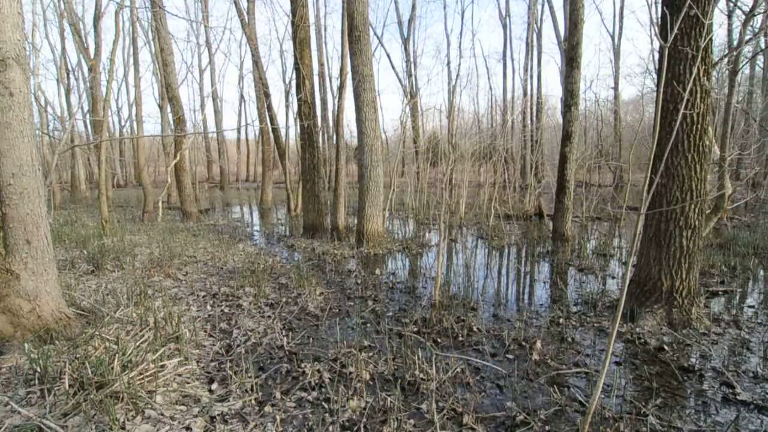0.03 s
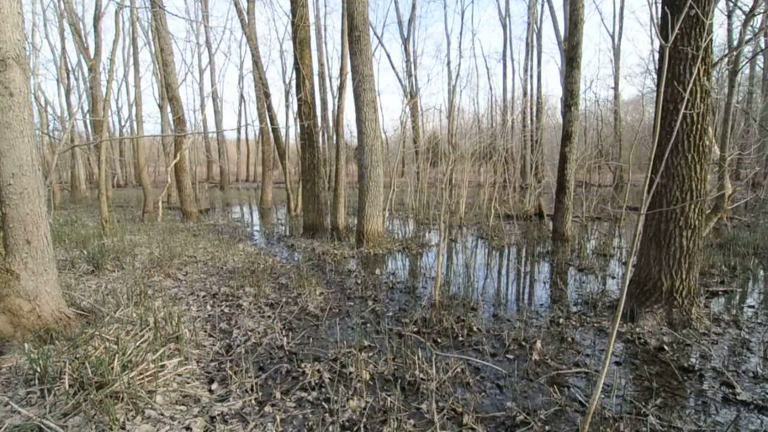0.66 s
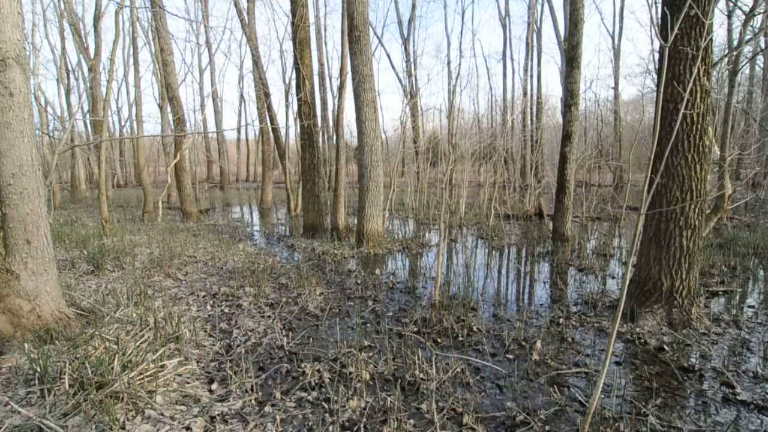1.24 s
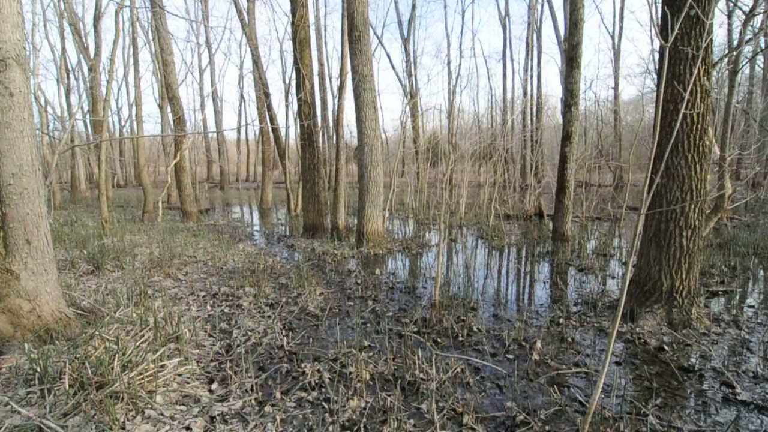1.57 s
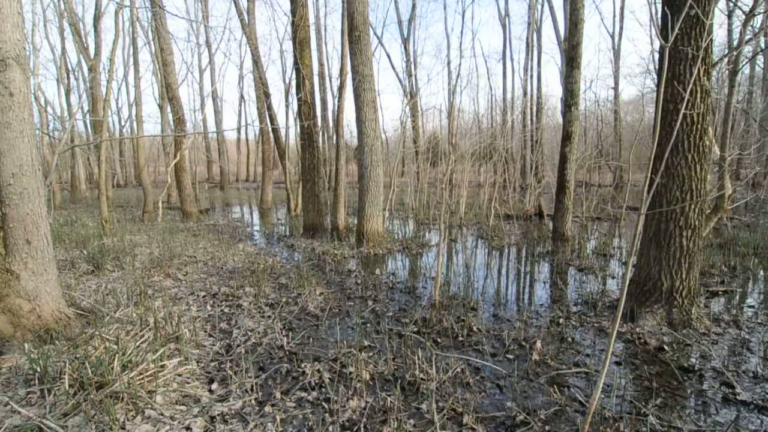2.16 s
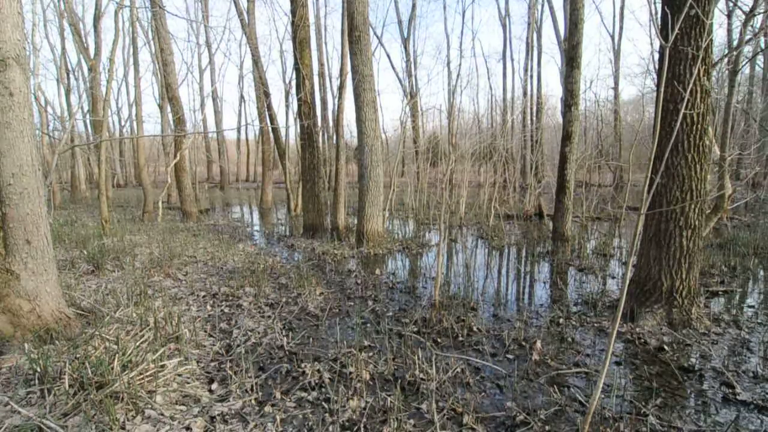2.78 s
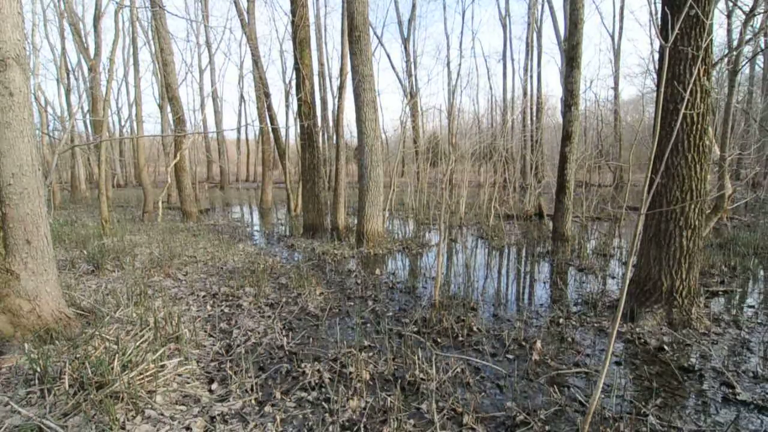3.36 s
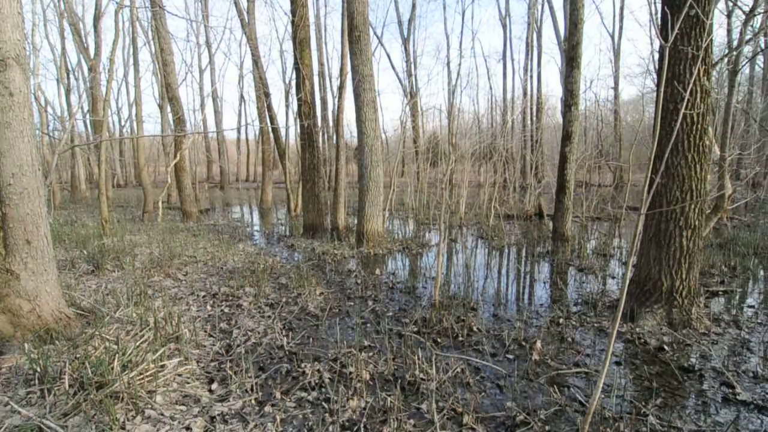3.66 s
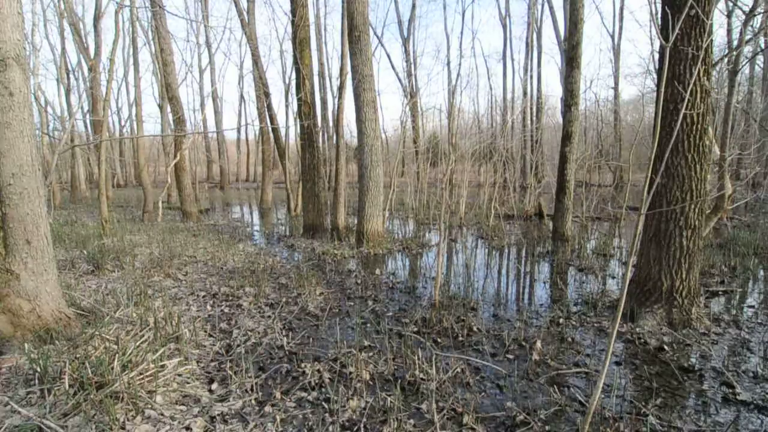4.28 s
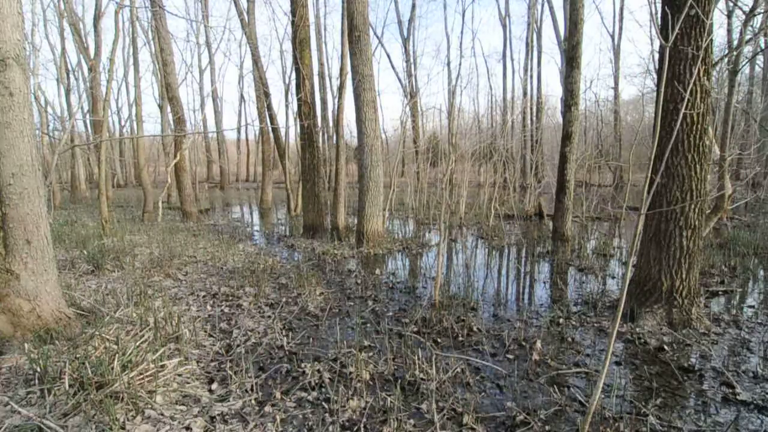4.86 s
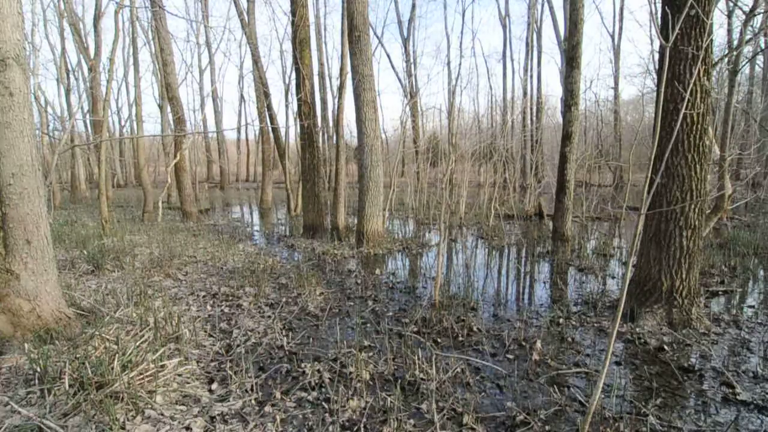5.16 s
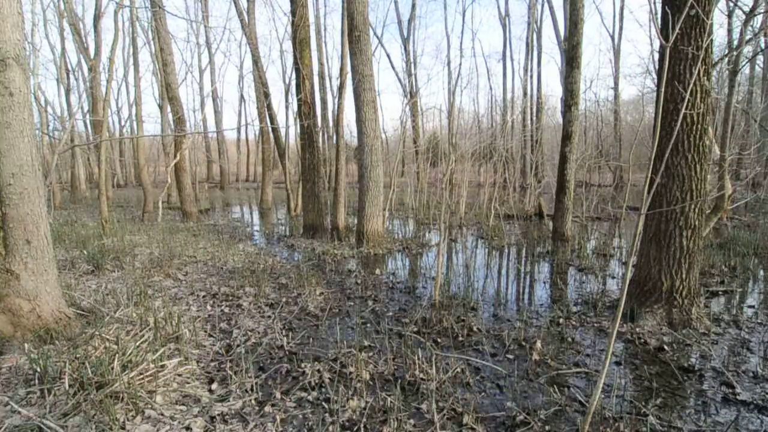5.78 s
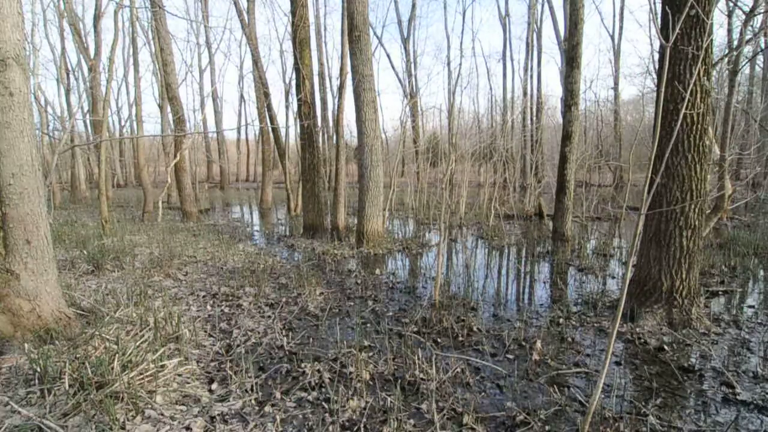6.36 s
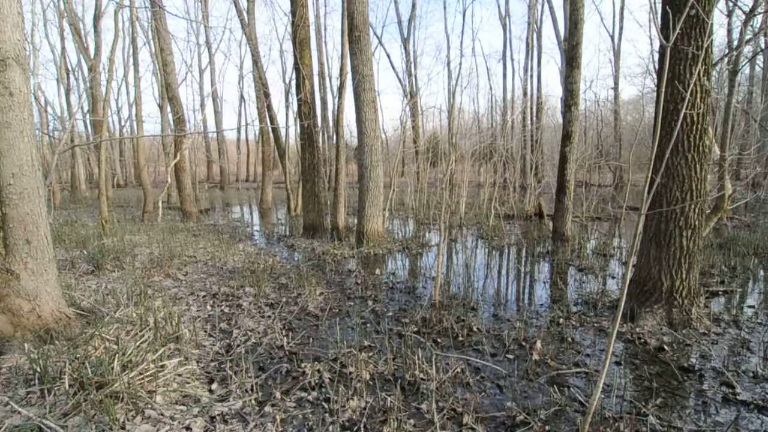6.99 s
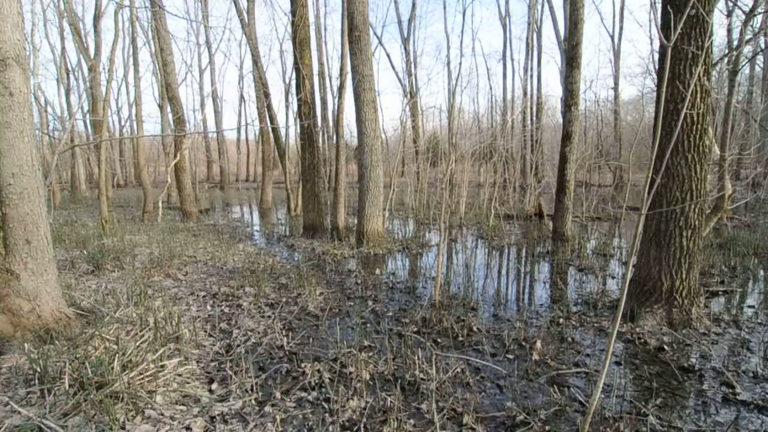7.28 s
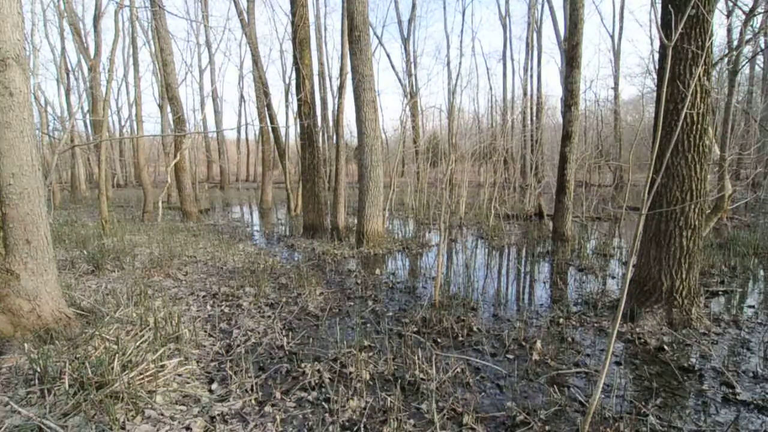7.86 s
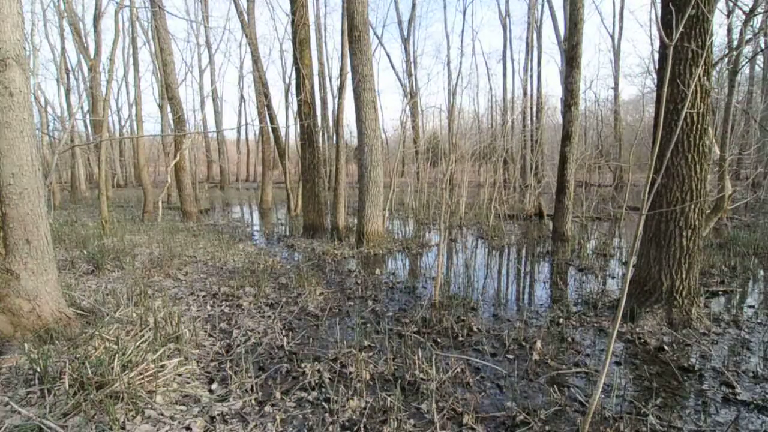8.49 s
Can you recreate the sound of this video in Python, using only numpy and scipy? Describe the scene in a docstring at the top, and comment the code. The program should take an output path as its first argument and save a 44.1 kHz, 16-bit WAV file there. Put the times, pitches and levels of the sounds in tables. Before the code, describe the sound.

A shrill chorus of spring peepers and rasping chorus frogs fills a woodland pool, with wind buffeting the microphone near the end.

```python
"""A shrill chorus of spring peepers fills a flooded woodland pool, over a low rumble. Chorus frogs rasp like
a thumb along a comb; close peepers whistle short rising peeps or trill at a rival, and faint clucks, low
whistles and squeaks come between. Each call is a vibration of the larynx, radiated by the vocal sac and
scattered by the trees. Loud crests tick in the microphone, and near the end a gust buffets it."""
import sys
import numpy as np
from scipy import signal
from scipy.fft import rfft, irfft, next_fast_len
from scipy.io import wavfile
from scipy.ndimage import uniform_filter1d, minimum_filter1d

SR = 44100
rng = np.random.default_rng(int(sys.argv[2]) if len(sys.argv) > 2 else 0)


def unload_wav(signal):
    """Save mono or channel-first audio to the path in sys.argv[1] as 16-bit WAV at rate SR, clipped to [-1, 1]."""
    wavfile.write(
        sys.argv[1],
        SR,
        np.round(np.clip(np.atleast_2d(signal).T, -1, 1) * 32767).astype(np.int16),
    )


N = 380583
TIME = np.arange(N) / SR
CHORUS_HZ = 2938


def from_db(db):
    """Amplitude ratio: tenfold for every 20 dB."""
    return 10 ** (np.asarray(db) / 20)


def unit_rms(x):
    """Normalisation to unit mean power."""
    return x / np.sqrt(np.mean(x ** 2) + 1e-20)


def envelope(rows):
    """Amplitude envelope, interpolated in decibels between rows of time_s, level_db."""
    return from_db(np.interp(TIME, *np.transpose(rows)))


def evened(x, span_s):
    """Running normalisation: division by the local rms holds the power near one."""
    return x / np.sqrt(uniform_filter1d(x ** 2, int(span_s * SR) + 1) + 1e-12)


def add(out, middle_s, sound):
    """Superposition: a sound is summed into the mix, centred on a moment."""
    start = int(middle_s * SR) - len(sound) // 2
    low, high = max(start, 0), min(start + len(sound), N)
    if high > low:
        out[low:high] += sound[low - start:high - start]


def noise(spectrum):
    """Spectral shaping: white noise coloured by rows of frequency_hz, density_db, at unit rms."""
    hz, db = np.transpose(spectrum)
    size = next_fast_len(N)
    bins_hz = np.maximum(np.arange(size // 2 + 1) * SR / size, 1)
    gain = from_db(np.interp(np.log(bins_hz), np.log(hz), db)) / (1 + (bins_hz / hz[-1]) ** 20)
    return unit_rms(irfft(rfft(rng.standard_normal(size)) * gain, size)[:N])


def woods(x, wet_db, first_echo_s=0.018, t60_s=0.65):
    """Scattering: trunks and water return decaying echoes, which change as calls come from new places."""
    size = SR // 2
    t = np.arange(size) / SR
    decay = unit_rms(from_db(-60 * t / t60_s) * (t > first_echo_s)) / np.sqrt(size)
    padded, window = np.pad(x, size), signal.windows.cosine(size)
    wet = np.zeros(N + 2 * size + SR)
    for start in range(0, N + size, size // 2):
        response = decay * rng.standard_normal(size)
        echoes = signal.fftconvolve(padded[start:start + size] * window, response)
        wet[start:start + len(echoes)] += echoes
    return x + from_db(wet_db) * wet[size:size + N]


def throat(hz, first_db, third_db):
    """Harmonic radiation: the vocal sac sounds the second harmonic at hz, with the first and third."""
    phase = 2 * np.pi * (np.cumsum(hz / 2) / SR + rng.random())
    return from_db(first_db) * np.sin(phase) + np.sin(2 * phase) + from_db(third_db) * np.sin(3 * phase)


def peep(hz, glide_hz_per_s, length_s, swell_db=5):
    """Linear frequency sweep: a nearly pure tone that swells towards its end."""
    t = np.arange(-length_s / 2, length_s / 2, 1 / SR)
    shape = signal.windows.tukey(len(t), 0.92) * from_db(swell_db * t / length_s)
    return shape * throat(hz + glide_hz_per_s * t, first_db=-35, third_db=-37)


def far_peepers(count=56, spread_hz=160, period_s=.78, length_s=.14, glide_hz_per_s=2900):
    """Incoherent sources: every male repeats his own pitch at his own pace and distance."""
    out = np.zeros(N)
    ranks = (np.arange(count) + .5) / count
    for hz in CHORUS_HZ + spread_hz * unit_rms(np.log(ranks / (1 - ranks))):  # few are very big or small
        pace_s, offset = period_s * rng.uniform(.8, 1.2), rng.random()
        db = rng.uniform(-6, 4.9) - 3.2 * abs(hz - CHORUS_HZ) / spread_hz  # middling males are loudest
        for k, (late, waver, effort) in enumerate(rng.standard_normal((16, 3))):
            middle_s = (k - offset) * pace_s + .03 * late
            if middle_s < TIME[-1] + length_s:
                call = peep(hz + 25 * waver, glide_hz_per_s * (1 + 0.1993 * effort), length_s)
                add(out, middle_s, from_db(db + 2 * effort) * call)
    return evened(woods(out, wet_db=-6), span_s=0.14)


# Spectrum of the most distant voices: frequency_hz, density_db
WASH_SPECTRUM = [(1000, -47.5), (1500, -27.5), (2050, -34), (2400, -22.5), (2650, -14), (2850, -3.5),
                 (3050, -1), (3300, -11.5), (3600, -32.5), (3900, -34), (4400, -35), (4850, -46.5),
                 (5300, -55.5)]
# Rise and fall of the far chorus: time_s, level_db
CHORUS_LEVELS = [(0.0, -17), (1.06, -15), (1.87, -18.5), (2.21, -16.5), (4.06, -16), (4.2, -19),
                 (4.42, -17.5), (4.71, -15), (5.43, -18), (5.77, -13.5), (5.96, -20.5), (6.18, -19),
                 (6.39, -15.5), (7.26, -19), (7.43, -16), (7.86, -17.5), (8.12, -15.5), (8.63, -17.5)]


def far_chorus():
    """Superposition of many voices: behind the far peepers, the most distant blur into a band of noise."""
    return envelope(CHORUS_LEVELS) * (from_db(-1.7) * far_peepers() + from_db(-8.5) * noise(WASH_SPECTRUM))


def click(hz, width_s, first_db, third_db, fall_hz_per_s=15000):
    """Gaussian tone pulse: one snap of a larynx, sagging in pitch."""
    t = np.linspace(-np.pi * width_s, np.pi * width_s, int(2 * np.pi * width_s * SR))
    return np.exp(-(t / width_s) ** 2) * throat(hz - fall_hz_per_s * t, first_db, third_db)


def far_raspers(count=150, pitch_hz=3060, spread_hz=195, gap_s=.062, quicken=.018, width_s=.0016):
    """Overlapping pulse trains: each distant chorus frog's rasp quickens, rises and grows louder."""
    out, steps = np.zeros(N), np.arange(18)
    for start_s in np.linspace(-1, TIME[-1], count):
        late, voice, slowness, nearness = rng.standard_normal(4)
        times = start_s + .05 * late + np.cumsum(gap_s * np.exp(.15 * slowness - quicken * steps))
        for time_s, effort in zip(times, np.linspace(-1, 0, len(steps))):
            hz = pitch_hz + spread_hz * np.clip(voice, -2, 2) + 120 * (effort + .5)
            db = 4 * np.clip(nearness, -2, 2) + 7 * effort
            add(out, time_s, from_db(db) * click(hz, width_s, first_db=-18.5, third_db=-32))
    # The frogs set each other off, so the rasping comes in waves, 2.4 s apart.
    wave_db = 2 * np.cos(2 * np.pi * (TIME - 0.46) / 2.4)
    return from_db(-24 + wave_db) * evened(woods(out, wet_db=-4), span_s=0.23)


# Spectrum of the low rumble: frequency_hz, density_db
RUMBLE_SPECTRUM = [(20, -11), (50, -1.5), (150, 4.5), (250, 1.5), (400, -4.5), (600, -10), (1100, -11.5)]


def background():
    """Ambient noise floor: a slowly fading rumble and a faint, steady hiss of air."""
    rumble = envelope([(0, -46), (8.6, -51)]) * noise(RUMBLE_SPECTRUM)
    air = from_db(-47.5) * noise([(300, -9.5), (600, -3.5), (1200, -3.5), (2200, 1.0), (5000, -17.5)])
    return rumble + air


# Rasps of the nearest chorus frogs: start_s, gap_s, click_count, pitch_hz, relative_level_db
NEAR_RASPS = [(0.023, 0.0755, 4, 3510, -23), (0.942, 0.0518, 8, 3550, -27.5),
              (2.665, 0.0755, 6, 3525, -23.5), (3.395, 0.058, 4, 3504, -34), (4.814, 0.057, 6, 3550, -27.5),
              (5.138, 0.072, 4, 3500, -26), (5.739, 0.061, 7, 3550, -34.5), (7.043, 0.062, 4, 3500, -25.5),
              (7.297, 0.079, 4, 3500, -23.5), (8.517, 0.075, 3, 3490, -27)]


def near_raspers(waver_hz=30, width_s=.0018, swell_db=1, gain_db=12):
    """Pulse trains slow enough for the ear to resolve: runs of ringing clicks above the peeping."""
    out = np.zeros(N)
    for start_s, gap_s, count, pitch_hz, db in NEAR_RASPS:
        beats = np.arange(count, dtype=float)
        beats[-1] -= 0.2  # the last click comes early
        for time_s, effort_db in zip(start_s + gap_s * beats, np.linspace(-swell_db, 0, count)):
            hz = pitch_hz + waver_hz * rng.standard_normal()
            snap = click(hz, width_s, first_db=-21, third_db=-39.5, fall_hz_per_s=30400)
            add(out, time_s, from_db(db + effort_db + gain_db) * snap)
    return woods(out, wet_db=-9, first_echo_s=0.00067)


# Single close peeps: middle_s, pitch_hz, relative_level_db
NEAR_PEEPS = [(0.059, 3060, -18.5), (0.13, 2960, -19.5), (0.26, 2837, -17), (0.408, 2928, -12),
              (0.47, 3166, -17.5), (0.529, 2680, -19.5), (0.549, 3045, -16.5), (0.867, 3213, -18.5),
              (0.949, 2966, -15.5), (1.197, 3124, -16), (1.377, 2830, -17), (1.437, 2774, -14.5),
              (1.527, 2928, -13), (1.742, 2784, -18), (2.01, 3130, -15.5), (2.041, 2855, -14.5),
              (2.185, 3020, -15.5), (2.189, 2710, -18), (2.419, 2837, -16), (2.461, 3000, -18.5),
              (2.591, 2877, -15), (2.738, 3010, -18), (3.087, 2783, -16.5), (3.212, 2880, -14.5),
              (3.308, 2864, -17), (3.536, 2880, -16), (3.802, 3153, -17), (3.971, 2964, -12.5),
              (4.11, 2990, -13), (4.201, 2894, -16.5), (4.632, 2777, -14), (4.673, 3057, -15),
              (4.714, 3004, -16.5), (4.945, 2640, -22.5), (5.158, 2940, -15.5), (5.624, 2687, -14),
              (5.701, 2984, -15.5), (5.792, 3030, -16), (5.877, 3064, -13.5), (6.235, 2973, -14),
              (6.459, 2875, -12), (6.649, 3000, -15), (6.699, 3083, -16), (6.864, 2950, -15),
              (6.994, 3006, -14.5), (7.348, 2915, -15), (7.459, 2753, -15), (7.508, 2998, -10),
              (7.613, 2953, -18.5), (7.872, 3100, -18.5), (8.067, 3128, -16.5), (8.25, 2755, -16.5),
              (8.331, 3063, -12.5)]
# Males keeping a steady beat: first_peep_s, period_s, peep_count, pitch_hz, relative_level_db
STEADY_BOUTS = [(0.04, 0.785, 4, 3456, -23), (3.25, 0.755, 3, 3410, -23.5), (0.6, 0.744, 2, 2595, -25.5),
                (2.98, 0.852, 5, 2605, -25)]


def near_peepers(length_s=.135, glide_hz_per_s=2850, gain_db=0.6):
    """Direct sound outweighs the echoes: close peeps stand distinct, all sweeping up at one rate."""
    out = np.zeros(N)
    beats = [(first_s + k * period_s, hz, db)
             for first_s, period_s, count, hz, db in STEADY_BOUTS for k in range(count)]
    for middle_s, hz, db in NEAR_PEEPS + beats:
        add(out, middle_s, from_db(db + gain_db) * peep(hz, glide_hz_per_s, length_s))
    return woods(out, wet_db=-6.5, first_echo_s=0.00063)


# Peepers' trills at a rival: start_s, length_s, pitch_hz, level_db
RIVAL_TRILLS = [(0.131, 0.29, 2316, -33), (1.273, 0.49, 2060, -39), (1.733, 0.24, 2090, -36),
                (2.236, 0.36, 2180, -32.5), (2.584, 0.38, 2330, -36), (4.718, 0.55, 2260, -39.5),
                (5.271, 0.33, 2307, -26.5), (7.56, 0.21, 2345, -27.5), (7.845, 0.27, 2360, -30.5)]


def trills(notes_per_s=29.5, rise_hz=69, note_fall_hz=200, waver_hz=25, uneven_db=1.6):
    """Amplitude modulation cuts a rising tone into falling notes, each of its own pitch and strength."""
    out = np.zeros(N)
    for start_s, length_s, pitch_hz, db in RIVAL_TRILLS:
        t = np.arange(int(length_s * SR)) / SR
        note, progress = np.divmod(t * notes_per_s, 1)
        waver, effort = rng.standard_normal((40, 2))[note.astype(int)].T
        hz = pitch_hz + rise_hz * (t / length_s - .5) - note_fall_hz * (progress - .5) + waver_hz * waver
        shape = np.sin(np.pi * progress) ** 4 * signal.windows.tukey(len(t), .2)
        tone = throat(hz, first_db=-22, third_db=-36)
        add(out, start_s + length_s / 2, from_db(db + uneven_db * effort) * shape * tone)
    return out


# Faint clucks of wood frogs: middle_s, pitch_hz, relative_level_db
WOOD_FROG_CLUCKS = [(0.198, 933, -40), (3.81, 894, -43.5), (4.45, 740, -47), (6.44, 842, -38.5),
                    (6.599, 869, -41), (7.51, 787, -41), (8.11, 990, -38), (8.167, 902, -38.5)]


def wood_frogs(width_s=0.012, gain_db=-3):
    """Roughness from random amplitude modulation: short, hoarse clucks from across the pool."""
    out = np.zeros(N)
    for middle_s, hz, db in WOOD_FROG_CLUCKS:
        cluck = click(hz, width_s, first_db=-17.5, third_db=5.5, fall_hz_per_s=1530)
        add(out, middle_s, from_db(db + gain_db) * cluck)
    roughness = 1 + noise([(30, -2), (130, -5)])
    return woods(out * roughness, wet_db=-5.5)


# Ticks of the overloaded microphone: time_s, relative_level_db
OVERLOAD_TICKS = [(0.401, -17), (4.647, -9), (4.727, -20), (5.185, -18.5), (5.654, -3), (5.68, -11),
                  (5.8, -13.5), (7.482, -4.5), (7.616, -1)]


def overload_ticks(crest=1.185, width_s=0.0011, gain_db=-1):
    """Clipping distortion: a flattened crest at the chorus pitch spills odd overtones into the treble."""
    out = np.zeros(N)
    pulse = crest * click(CHORUS_HZ, width_s, first_db=-31, third_db=-32)
    distortion = np.clip(pulse, -1, 1) - pulse
    for time_s, db in OVERLOAD_TICKS:
        add(out, time_s, from_db(db + gain_db) * distortion)
    return out


# Long, low whistles: start_s, length_s, pitch_hz, arch_hz (negative sags), level_db
LOW_WHISTLES = [(0.483, 0.12, 2260, -78, -38.5), (.88, 0.28, 2460, 101, -35.5),
                (1.219, 0.21, 2355, -55, -32.5), (1.81, 0.28, 2437, 80.5, -34),
                (3.306, 0.28, 2406, -41, -34), (4.503, .13, 2380, -56, -36.5),
                (6.38, 0.18, 2420, -17.5, -34), (8.36, 0.19, 2400, -93, -31)]


def whistles(lift_hz=80, quaver_hz=13):
    """Frequency modulation: a drawn-out tone follows a tilted parabola with a slight random quaver."""
    out = np.zeros(N)
    quaver = quaver_hz * noise([(8, 0), (45, -6)])
    for start_s, length_s, pitch_hz, arch_hz, db in LOW_WHISTLES:
        position = np.linspace(-1, 1, int(length_s * SR))
        contour_hz = pitch_hz + lift_hz * position / 2 - arch_hz * position ** 2
        hz = contour_hz + np.interp(start_s + length_s * position / 2, TIME, quaver)
        call = signal.windows.tukey(len(hz), .5) * throat(hz, first_db=-30, third_db=-33.5)
        add(out, start_s + length_s / 2, from_db(db) * call)
    return out


# Short squeaks: middle_s, pitch_hz, glide_hz_per_s, level_db
FALLING_SQUEAKS = [(1.712, 1776, -1000, -38), (1.748, 1690, -6000, -33.5), (1.781, 1690, -1000, -41.5),
                   (1.885, 2010, -3000, -41), (2.6, 2210, -3000, -29.5), (5.553, 2195, -14000, -32.5),
                   (5.768, 2130, -9000, -31)]


def squeaks(length_s=0.052):
    """Downward frequency sweeps: brief calls below the pitch of the chorus."""
    out = np.zeros(N)
    for middle_s, hz, glide_hz_per_s, db in FALLING_SQUEAKS:
        add(out, middle_s, from_db(db) * peep(hz, glide_hz_per_s, length_s))
    return out


def gust(start_s, length_s, attack_s=0.016, release_s=0.02):
    """Envelope of a gust: linear rise, hold and exponential decay."""
    age_s = TIME - start_s
    return np.clip(age_s / attack_s, 0, 1) * np.exp(-np.maximum(age_s - length_s, 0) / release_s)


# Spectrum of the eddies: frequency_hz, density_db
EDDY_SPECTRUM = [(20, -13), (45, -1.5), (90, -2), (170, -4.5), (260, -9), (380, -19.5), (560, -30.5),
                 (1100, -55)]
# Gusts on the microphone: start_s, length_s, level_db
WIND_GUSTS = [(5.993, 0.012, -36.5), (7.05, 0.91, -54.5), (7.37, 0.16, -49.5), (7.457, 0.038, -41),
              (7.815, 0.042, -32.5), (7.894, 0.11, -41), (8.011, 0.13, -23), (8.164, 0.12, -23),
              (8.306, 0.017, -17), (8.355, 0.072, -28.5), (8.434, 0.18, -17.5)]


def wind(lumps_db=4, breeze_cutoff_hz=80, full_gust_db=-27):
    """Turbulence at the microphone port: a light breeze only rumbles, a full gust flutters higher."""
    strength = sum(from_db(db) * gust(start_s, length_s) for start_s, length_s, db in WIND_GUSTS)
    eddies = noise(EDDY_SPECTRUM) * from_db(lumps_db * noise([(5, -2.5), (40, -7)]))
    breeze = signal.sosfilt(signal.butter(2, breeze_cutoff_hz, fs=SR, output="sos"), eddies)
    force = np.minimum(strength / from_db(full_gust_db), 1)
    return strength * evened(force * eddies + (1 - force) * breeze, span_s=0.07)


def scene():
    """Linear superposition: far chorus, near callers and wind sum at one microphone."""
    distant = far_chorus() + far_raspers() + background()
    near = near_peepers() + near_raspers()
    low_calls = woods(whistles() + trills() + squeaks(), wet_db=-5.5)
    return (distant + near + low_calls + wood_frogs() + wind())[None]


def record(dry, microphone_top_hz=4980, cutoff_hz=15800):
    """Band limiting: the microphone passes little treble; peaks are held to full scale, ticks added."""
    dull = signal.sosfilt(signal.butter(16, microphone_top_hz, fs=SR, output="sos"), dry)
    limiter_gain = minimum_filter1d(np.minimum(1, 1 / (np.abs(dull) + 1e-9)), size=181)
    smooth_gain = uniform_filter1d(uniform_filter1d(limiter_gain, size=90), size=90)
    lowpass = signal.ellip(10, .1, 80, cutoff_hz, fs=SR, output="sos")
    return signal.sosfilt(lowpass, dull * smooth_gain + overload_ticks())


dry = scene()
out = record(dry)
unload_wav(out)
```